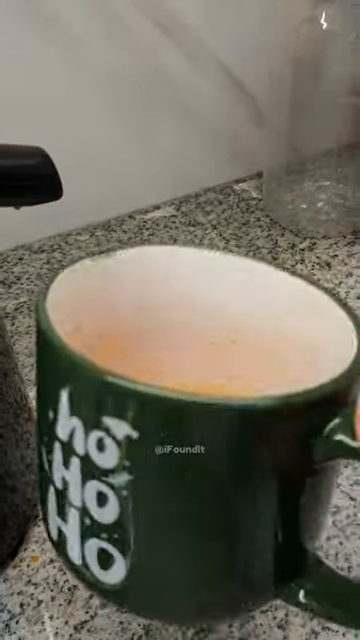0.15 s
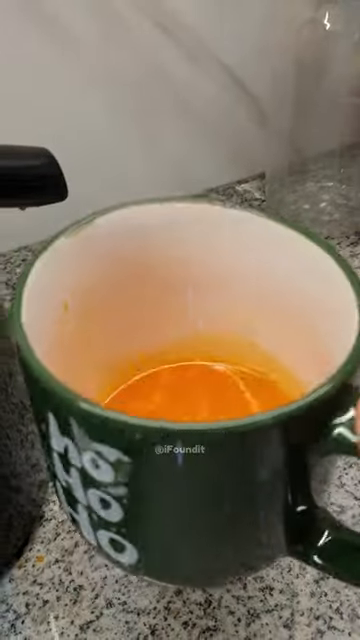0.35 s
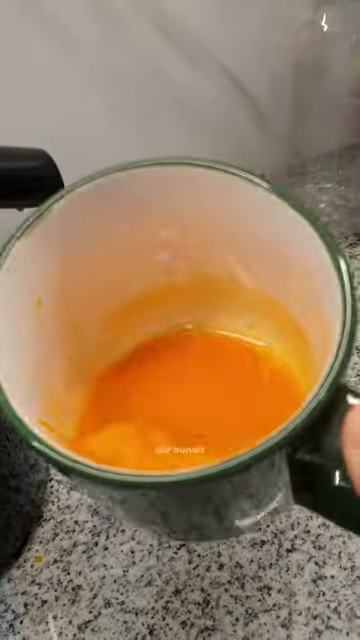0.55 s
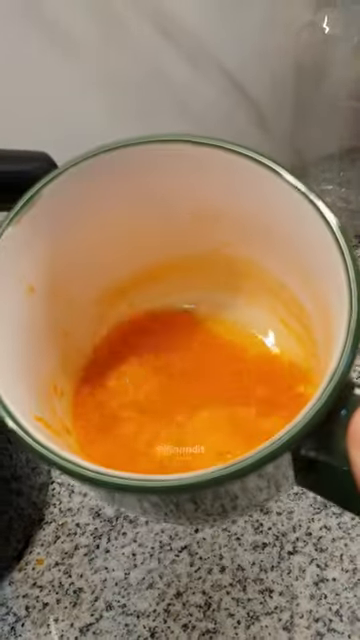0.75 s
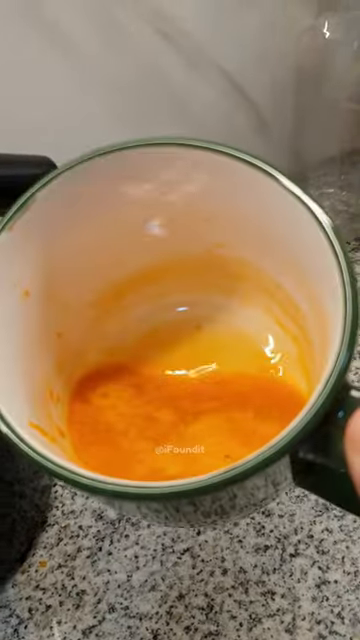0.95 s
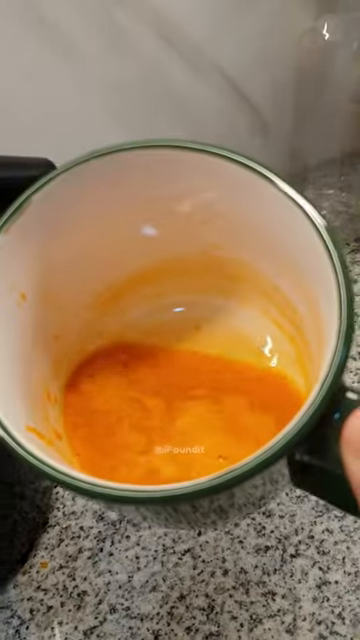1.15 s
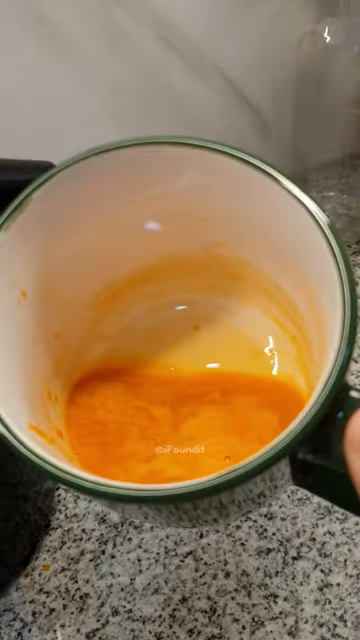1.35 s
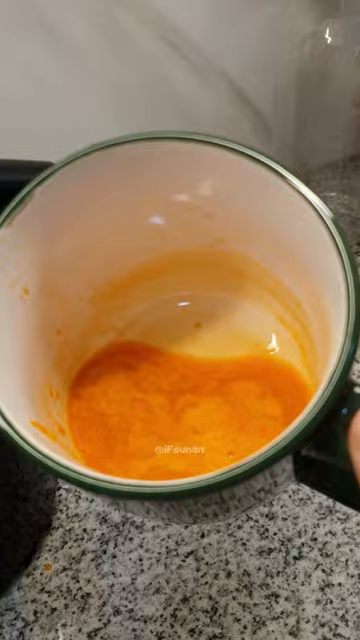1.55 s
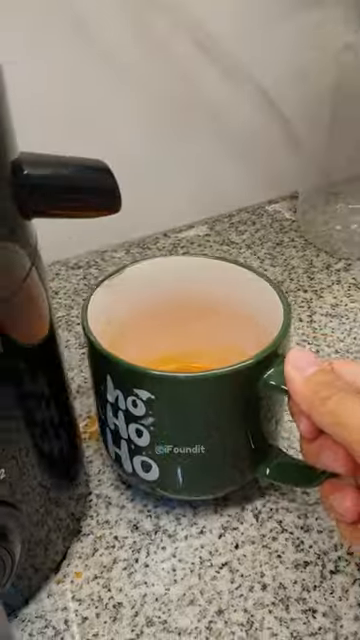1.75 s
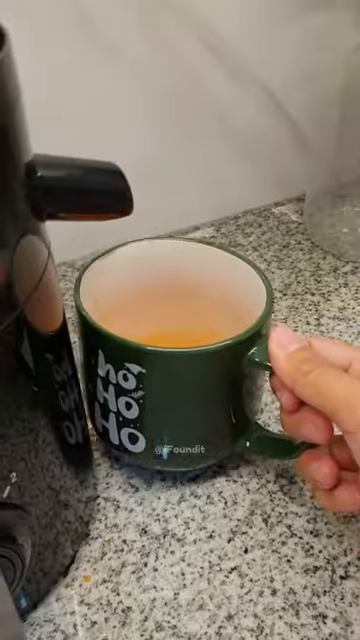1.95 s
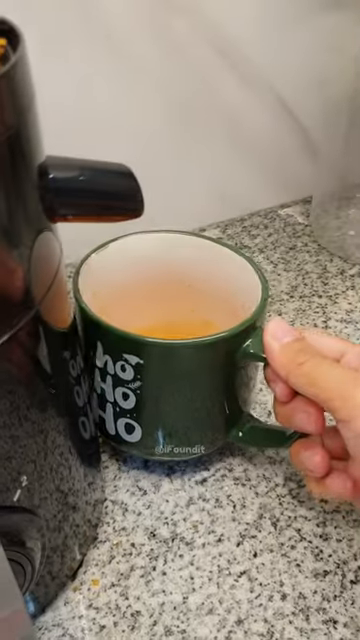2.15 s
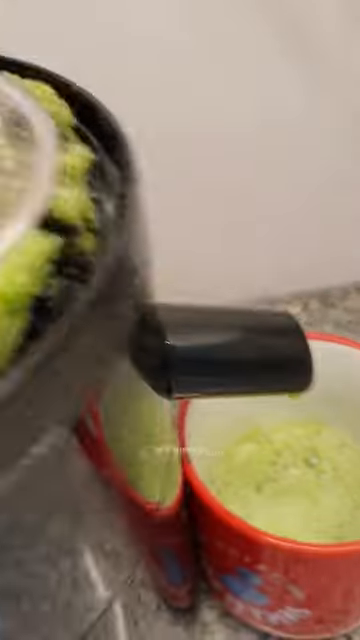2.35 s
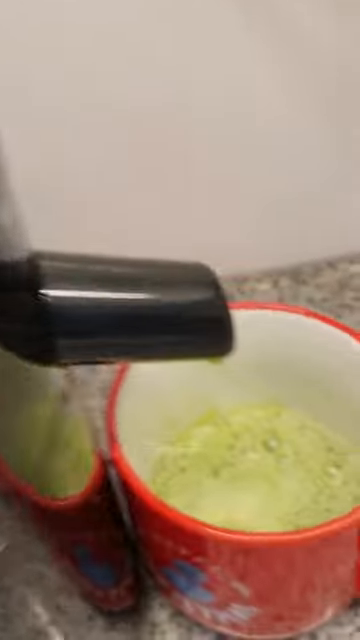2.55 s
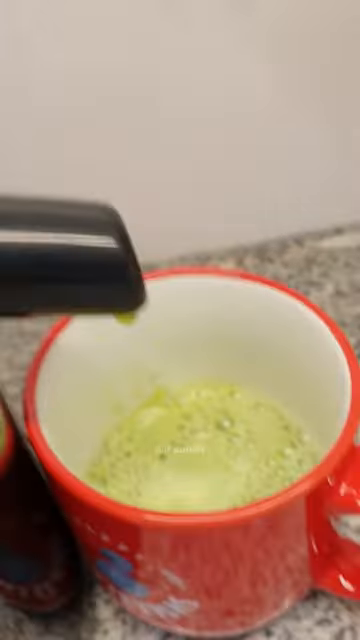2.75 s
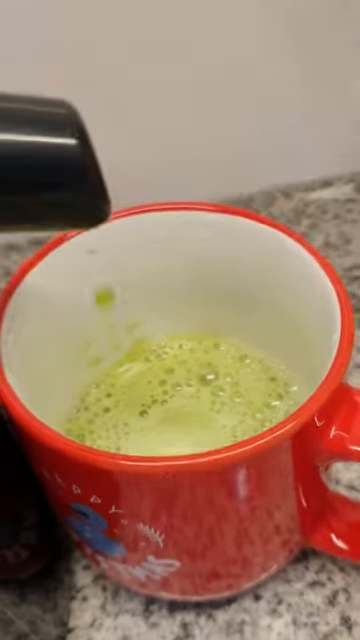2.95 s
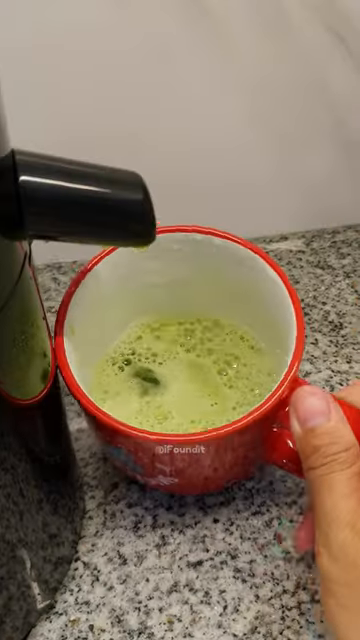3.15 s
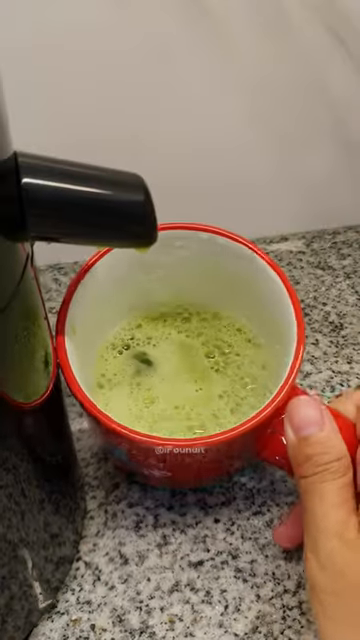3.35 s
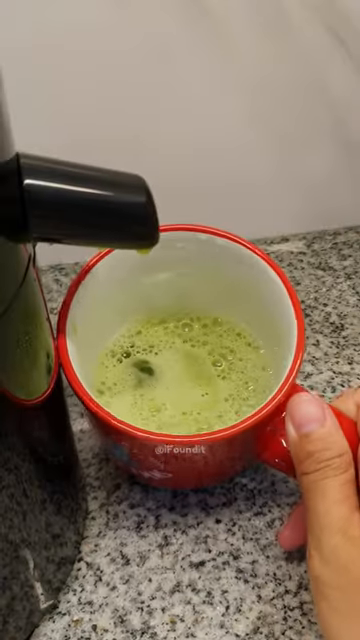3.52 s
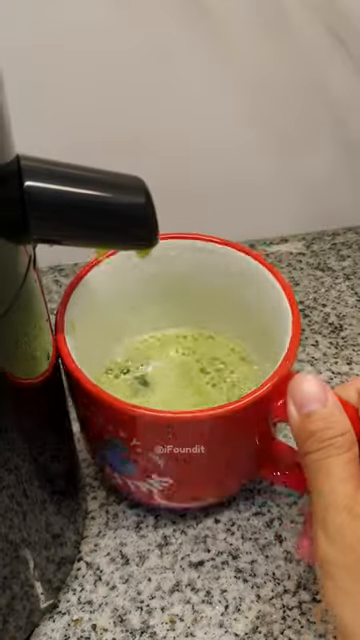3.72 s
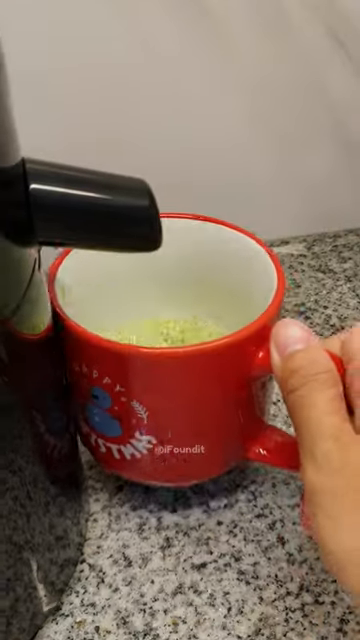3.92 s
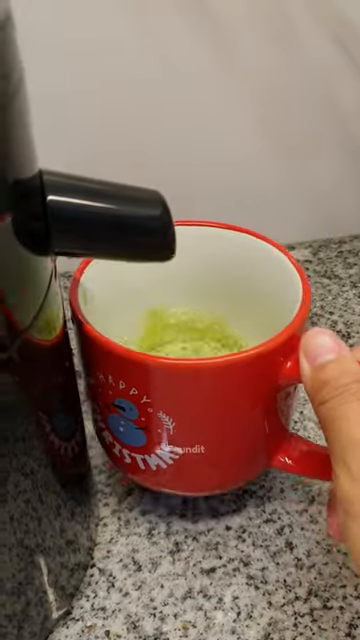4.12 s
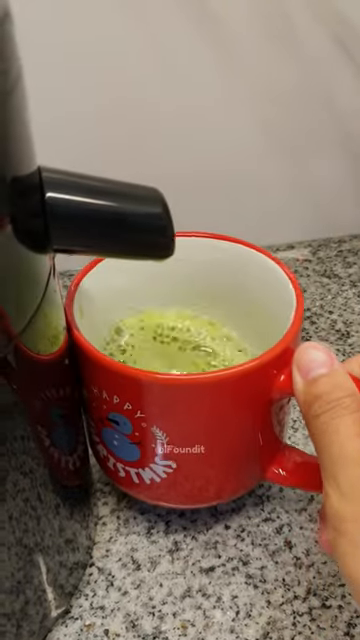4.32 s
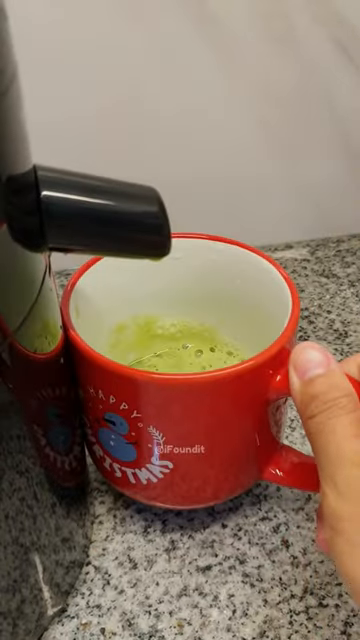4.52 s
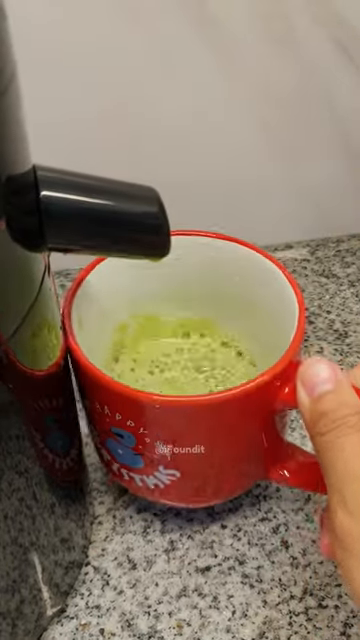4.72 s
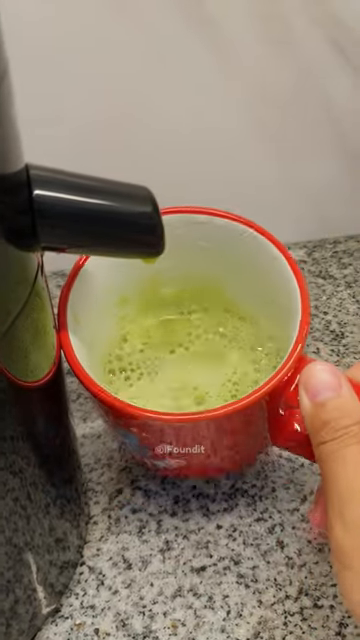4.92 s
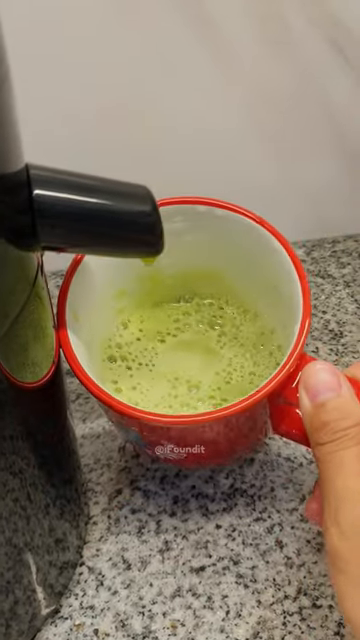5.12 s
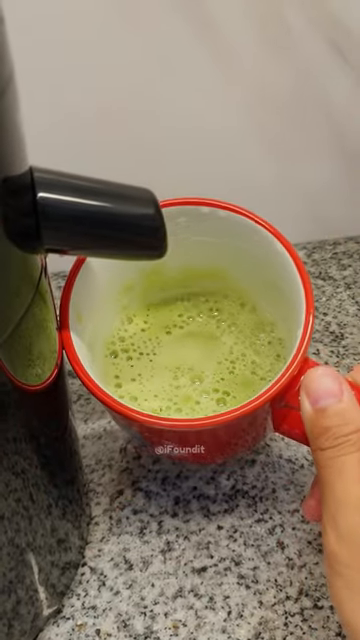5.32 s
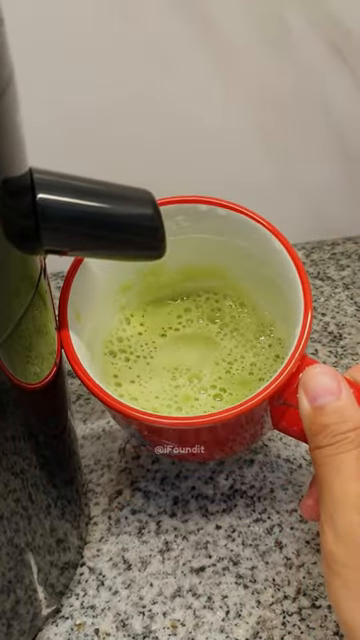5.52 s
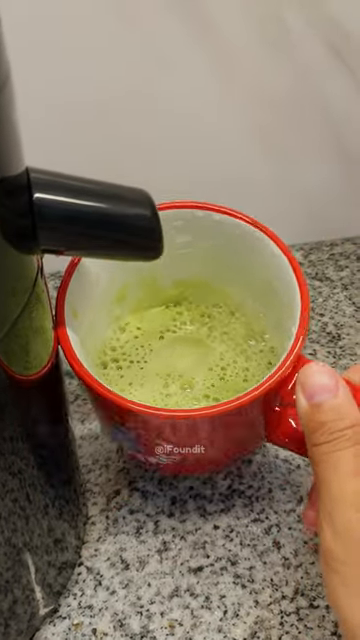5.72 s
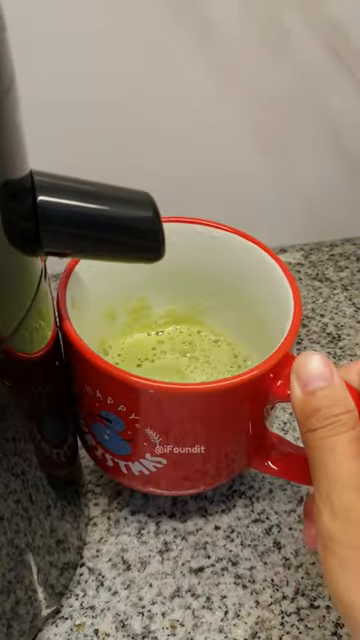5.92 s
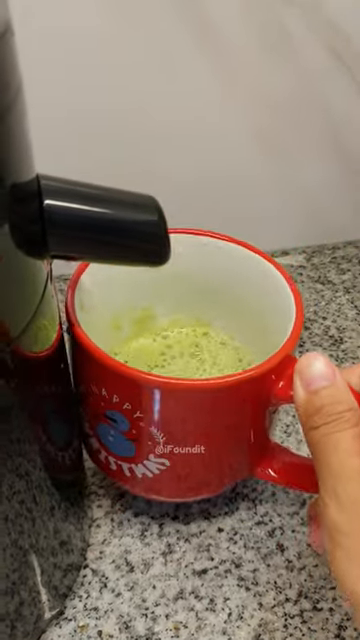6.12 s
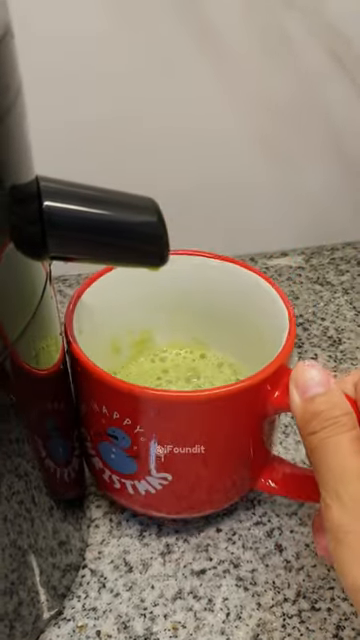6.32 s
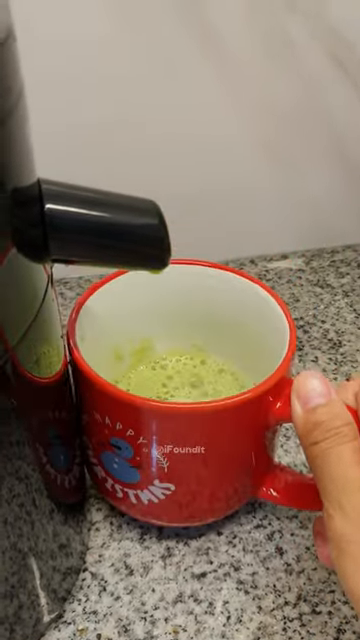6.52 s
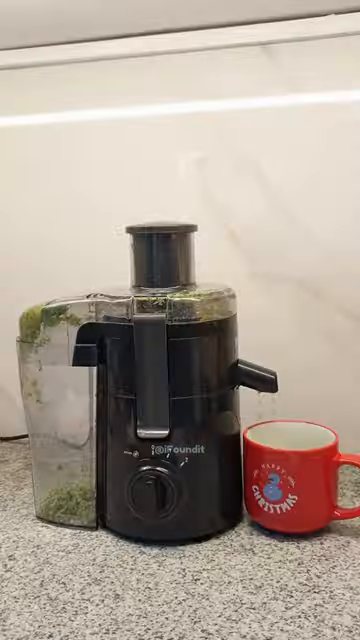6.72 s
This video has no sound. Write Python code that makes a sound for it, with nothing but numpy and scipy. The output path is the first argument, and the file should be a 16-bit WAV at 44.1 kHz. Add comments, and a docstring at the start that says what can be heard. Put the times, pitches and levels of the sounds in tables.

```python
"""Two ceramic mugs on a stone counter beside a switched-off juicer, in a small hard kitchen.
Faint appliance hum and hand-held microphone rumble run throughout. At 1.8 s a mug lands, rocks on
its gritty foot and settles, then bumps the juicer's hollow plastic housing. Fingers brush a handle
(3.1 s), a base knocks and scrapes on the stone, and dull bumps on the housing follow (4.0-4.8 s).
At 6.0 s a soft thump and a rub; at 6.4 s the second mug lands hard and rocks, its ring cut short."""
import sys
import numpy as np
from scipy import signal
from scipy.fft import rfft, irfft, next_fast_len
from scipy.io import wavfile
from scipy.ndimage import uniform_filter1d

SR = 44100
rng = np.random.default_rng(int(sys.argv[2]) if len(sys.argv) > 2 else 0)


def output_pcm(signal):
    """Save a mono or channel-first signal as 16-bit PCM at the path in sys.argv[1].

    Samples are clipped to [-1, 1] before scaling.
    """
    pcm = np.clip(np.atleast_2d(signal).T, -1, 1) * 32767
    wavfile.write(sys.argv[1], SR, np.round(pcm).astype(np.int16))


N = 298551


def amp(db):
    """dB to gain."""
    return 10 ** (np.asarray(db) / 20)


def unit_rms(x):
    """Scale to rms 1."""
    return x / np.sqrt(np.mean(x ** 2) + 1e-20)


def at_hz(points, hz):
    """Interpolate a table over log frequency."""
    f, value = np.transpose(points)
    return np.interp(np.log(hz + 1), np.log(f + 1), value)


def gain_curve(rows):
    """(t/s, level/dB) points to gain per sample."""
    return amp(np.interp(np.arange(N) / SR, *np.transpose(rows)))


def add(mix, start_s, sound):
    """Mix a sound in at start_s."""
    part = mix[..., round(start_s * SR):][..., :sound.shape[-1]]
    part += sound[..., :part.shape[-1]]


def pan(db):
    """Stereo gains; db is left minus right."""
    return amp(np.array([[db], [-db]]) / 2)


def noise(spectrum, size, shared, tilt_db_oct=0):
    """Coloured stereo noise, rms 1, tilted above 1 kHz; shared is the power common to both sides."""
    hz = np.fft.rfftfreq(size, 1 / SR)
    white = rng.standard_normal((3, size))
    pair = np.sqrt(shared) * white[0] + np.sqrt(1 - shared) * white[1:]
    colour = amp(at_hz(spectrum, hz) + tilt_db_oct * np.log2(np.maximum(hz / 1000, 1)))
    return unit_rms(irfft(rfft(pair) * colour, size))


def ring(modes, t, pitch=1, tilt_db_oct=0, pivot_hz=1000):
    """Damped sines; pitch scales their frequencies, tilt weights them about pivot_hz."""
    out = 0
    for hz, db, t60_s in modes:
        gain = amp(db + tilt_db_oct * np.log2(hz / pivot_hz))
        out += gain * np.exp(-np.log(1000) * t / t60_s) * np.sin(2 * np.pi * hz * pitch * t)
    return out


def pulse(spectrum, size):
    """Minimum-phase pulse, peak 1."""
    hz = abs(np.fft.fftfreq(size, 1 / SR))
    log_gain = np.log(amp(at_hz(spectrum, hz)))
    x = np.fft.ifft(np.exp(np.conj(signal.hilbert(log_gain)))).real
    return x / abs(x).max()


def friction(strokes, spectrum, grain_db, attack_s=0.004, release_s=0.0094):
    """Stick-slip: short noise strokes whose level jitters by grain_db rms."""
    out = np.zeros((2, N))
    for start_s, length_s, db, tilt_db_oct in strokes:
        t = np.arange(int(length_s * SR)) / SR
        jitter = unit_rms(uniform_filter1d(rng.standard_normal(len(t)), size=90))
        hiss = noise(spectrum, len(t), shared=0.45, tilt_db_oct=tilt_db_oct)
        fade = np.minimum(t / attack_s, 1) * np.minimum((length_s - t) / release_s, 1)
        add(out, start_s, amp(db) * unit_rms(hiss * amp(grain_db * jitter)) * fade)
    return out


# Hum before panning: t/s, level/dB
HUM_LEVELS = [(0, -77), (2, -76.5), (2.7, -70.5), (6.77, -72)]


def appliance_hum(hum_hz=358, waver=0.26):
    """One wavering tone on the right, growing as the microphone nears it."""
    drift = waver * noise([(1, 0), (4, -6), (15, -60), (100, -140)], N, shared=0.8)
    tone = np.sqrt(2) * np.sin(2 * np.pi * hum_hz * np.arange(N) / SR + drift)
    return gain_curve(HUM_LEVELS) * (1 + drift) * tone * pan(db=-18)


# Air noise density: f/Hz, level/dB
AIR_SPECTRUM = [(25, -9.5), (55, -0.5), (200, -19.5), (400, -14.5), (480, -19.5), (600, -27.5), (2300, -32),
                (4500, -37.5), (7000, -47.5), (10000, -42.5), (12000, -33.5), (15500, -39)]


def room_air(level_db=-68.5):
    """Still air: a steady noise floor."""
    return amp(level_db) * noise(AIR_SPECTRUM, N, shared=0.25) * pan(db=1.5)


# Rumble density: f/Hz, level/dB
RUMBLE_SPECTRUM = [(25, -15), (58, 8), (90, 7), (105, -6), (120, 9.5), (142, -5.5), (166, 2.5), (200, -10),
                   (235, -8), (300, -16), (440, -11), (600, -24.5), (1500, -47)]
# Rumble level and balance, dropping away at the end: t/s, level/dB before trim, left minus right/dB
RUMBLE_LEVELS = [(0.0, -71.5, -12), (1.15, -75.5, -17), (2.55, -61.5, -2), (2.85, -58, -1.5),
                 (3.86, -63, -3), (4.54, -56.5, 0.5), (4.94, -62, -3), (6.35, -57.5, -2), (6.62, -66, -1),
                 (6.77, -71, 8)]


def handling_rumble(trim_db=1):
    """Low rumble of a hand-held microphone, booming in the room modes."""
    left = gain_curve([(s, db + pan_db / 2) for s, db, pan_db in RUMBLE_LEVELS])
    right = gain_curve([(s, db - pan_db / 2) for s, db, pan_db in RUMBLE_LEVELS])
    return amp(trim_db) * np.array([left, right]) * noise(RUMBLE_SPECTRUM, N, shared=1)


# Modes of the held mug and of the knocked slab: f/Hz before pitch factor, level/dB, t60/s
MUG_MODES = [(846, -2.5, 0.3), (962, -11.5, 0.047), (1249, -19.5, 0.05), (1385, -22, 0.027),
             (1822, -21, 0.06), (2200, -26, .03), (2530, -19, 0.012)]
THUD_MODES = [(168, -7.5, 0.045), (302.3, -4, 0.036), (492, -6.5, 0.028)]
# Densities of the first touch and of the foot's crack and grit: f/Hz, level/dB
CLICK_SPECTRUM = [(150, -20), (600, -15), (880, 1), (1400, -8), (2500, -9), (3600, -24), (15000, -47)]
CRACK_SPECTRUM = [(100, -30), (600, -22.5), (850, -4.5), (1100, -6), (1450, -1.5), (1700, -9), (2100, -4),
                  (2750, -2), (3500, -22.5), (4200, -21.5), (5200, -9), (6300, -20.5), (11000, -25.5),
                  (15000, -48.5)]
GRIT_SPECTRUM = [(2000, -17.5), (5500, -7), (8000, -23), (9300, -3), (10200, 2.5), (11500, -8),
                 (14000, -23)]
# Mug knocks, and the quick echoes just after each of the two landings:
# t/s, level/dB, pitch factor, hardness/Hz, ring/s, click/dB, grit/dB
KNOCKS_AND_ECHOES = [(1.7562, -24.5, 0.86, 2000, 0.0038, -4, -29), (1.7665, -28, 1.0, 2500, .008, -22, -36),
                     (1.7761, -31, 1.04, 1500, .0065, -30, -37),
                     (1.8593, -16, 1.04, 1230, 0.007, -35, -38.5),
                     (1.9163, -19.5, 1.03, 1000, .0069, -36, -42.5),
                     (1.9831, -28.5, 1.045, 840, 0.0081, -40, -43), (2.003, -32, 1.02, 784, .009, -38, -40),
                     (2.1917, -30, 1.016, 1060, 0.0079, -24, -37),
                     (3.3577, -31.5, 1.08, 2100, .011, -9, -46),
                     (6.447, -4.5, 1.105, 4370, 0.0052, -4, -34.5),
                     (6.465, -18, 1.15, 2790, 0.0056, -16.5, -33),
                     (6.4998, -10.5, 1.126, 2460, 0.0061, -13, -43),
                     (6.5371, -17, 1.134, 2010, 0.0063, -19, -46),
                     (6.5522, -21, 1.07, 1700, 0.0063, -22, -56),
                     (6.559, -22, 1.09, 1500, 0.0058, -25, -58)]


def mug_knocks(lag_s=0.00013, contact_s=0.00035, crack_s=0.0045, grit_s=0.003, thud_db=-16.5,
               tail_db=-30, tail_s=0.041, choke_hz=5500, crack_full_hz=3040, crack_db_oct=14.5):
    """A mug clicks on stone and rings until its base chokes it; the unglazed foot cracks and grits."""
    out, t = np.zeros((2, N)), np.arange(SR // 6) / SR
    heard_s = np.maximum([t - lag_s, t], 0)  # right side leads
    contact = 1 - np.exp(-(heard_s / contact_s) ** 2)
    radiation = signal.butter(4, 780, "high", fs=SR, output="sos")  # small body, little bass
    thud = amp(thud_db) * ring(THUD_MODES, heard_s, pitch=0.9) * contact / 2
    click = np.interp(heard_s, t, pulse(CLICK_SPECTRUM, len(t))) * (heard_s > 0)
    for start_s, db, pitch, hard_hz, ring_s, click_db, grit_db in KNOCKS_AND_ECHOES:
        detune = 1 + 0.015 * rng.uniform(-1.2, 1)
        choke = np.exp(-(t / ring_s) ** (choke_hz / hard_hz))  # soft blows stay in contact: steeper
        decay = choke + amp(tail_db) * np.exp(-t / tail_s)
        body = pan(db=1) * ring(MUG_MODES, heard_s, pitch * detune) * decay
        crack_db = crack_db_oct * min(np.log2(hard_hz / crack_full_hz), 0)
        crack = amp(crack_db) * noise(CRACK_SPECTRUM, len(t), shared=0.74) * np.exp(-t / crack_s) / 2
        grit = amp(grit_db) * noise(GRIT_SPECTRUM, len(t), shared=0.3) * np.exp(-t / grit_s)
        radiated = signal.sosfilt(radiation, (body + crack) * contact)
        softness = signal.butter(3, hard_hz, fs=SR, output="sos")  # soft blows miss the upper modes
        blow = signal.sosfilt(softness, radiated - thud)
        add(out, start_s, amp(db) * (blow + amp(click_db) * click + grit * contact))
    return out


# Foot on stone: t/s, length/s, level/dB, tilt/(dB/oct)
GRIND_STROKES = [(1.757, 0.035, -74, -2), (1.975, 0.09, -74.5, 6)]


def foot_grinds():
    """The rocking foot grinds on the stone."""
    return friction(GRIND_STROKES, GRIT_SPECTRUM, grain_db=3)


# Low worktop modes: f/Hz before pitch factor, level/dB, t60/s
SLAB_MODES = [(117.3, -13, 0.26), (167, 0, 0.27), (232, -14, 0.18), (293, -15, 0.21)]
# Weight on the counter: t/s, level/dB, rise/s
SETTLE_PUSHES = [(2.017, -46, 0.003), (3.36, -44, 0.0031), (5.983, -23.5, 0.038), (6.561, -33.5, 0.0013)]


def mug_settles():
    """The mug's weight softly pushes the worktop, moving only its low modes."""
    out, t = np.zeros((2, N)), np.arange(SR // 2) / SR
    thump = pan(db=1) * ring(SLAB_MODES, t, pitch=0.98)
    for start_s, db, rise_s in SETTLE_PUSHES:
        add(out, start_s, amp(db) * thump * (1 - np.exp(-(t / rise_s) ** 2)))
    return out


# Thin plastic wall with the mug against it: f/Hz, level/dB, t60/s
WALL_MODES = [(800, -17, .1), (942, -16, 0.13), (1075, -13, 0.11), (1900, -20, 0.05), (2270, -19, 0.05),
              (2510, -9, .05), (2790, -6, 0.05), (3300, -11, 0.05), (4320, -17, .06), (5700, -20, .06)]
# Hollow housing: f/Hz before pitch factor, level/dB, t60/s
HOUSING_MODES = [(121, -5, .34), (167, -2.5, .16), (236, -9, .22), (286, -3, .23), (350, -15, .12)]
# Rattle density: f/Hz, level/dB
RATTLE_SPECTRUM = [(150, 13.5), (480, 0), (680, -7), (950, 8), (1400, -5.5), (2000, -3), (2800, -4),
                   (4100, -7), (5500, -14), (8000, -19), (11500, -14.5), (15500, -29)]
# Mug on housing: t/s, slap/dB, slap tilt/(dB/oct), wall re slap/dB,
# thump/dB, thump tilt/(dB/oct), rise/s, mug cavity/dB
HOUSING_HITS = [(2.1397, -39.5, 0, -11.5, -38.5, -3, 0.0037, -39.5),
                (4.0105, -29, 1, -2, -25, 4, 0.0071, -55), (4.3238, -30.5, 0, 1, -30, 9.5, 0.0069, -50.5),
                (4.35, -37, -0.5, -2, -29, -7, 0.018, -49),
                (4.5254, -41, -2.5, -2.5, -33.5, -4, 0.0053, -54),
                (4.541, -45, -2.5, -5, -45, 6, 0.0053, -63),
                (4.7388, -45.5, -4, 2.5, -33.5, -3, 0.0032, -63)]


def housing_bumps(lag_s=0.000083, attack_s=0.00078, rattle_s=0.015, cavity_hz=478, cavity_t60_s=0.15):
    """A rattling slap on the plastic wall; housing modes and the mug's cavity then swell and die."""
    out, t = np.zeros((2, N)), np.arange(SR // 2) / SR
    heard_s = np.maximum([t - lag_s, t], 0)
    cavity = pan(db=-11.5) * ring([(cavity_hz, 0, cavity_t60_s)], t)
    radiation = signal.butter(3, 90, "high", fs=SR, output="sos")  # wall radiates no deep bass
    for start_s, slap_db, slap_db_oct, wall_db, thump_db, thump_db_oct, rise_s, boom_db in HOUSING_HITS:
        # each spot favours other modes
        modes = [(hz, db + 4 * rng.uniform(-0.92, 1), t60_s) for hz, db, t60_s in WALL_MODES]
        wall = amp(wall_db) * ring(modes, heard_s, tilt_db_oct=slap_db_oct, pivot_hz=1026)
        rattle = noise(RATTLE_SPECTRUM, len(t), shared=0.35, tilt_db_oct=slap_db_oct)
        rattle *= np.exp(-t / rattle_s)
        slap = signal.sosfilt(radiation, (rattle + wall) * (1 - np.exp(-t / attack_s)))
        thump = pan(db=1) * ring(HOUSING_MODES, t, pitch=0.99, tilt_db_oct=thump_db_oct, pivot_hz=173)
        hollow = amp(thump_db) * thump + amp(boom_db) * cavity
        swell = 1 - np.exp(-(t / rise_s) ** 2)
        add(out, start_s, amp(slap_db) * slap + hollow * swell)
    return out


# Brush density: f/Hz, level/dB
BRUSH_SPECTRUM = [(1000, -1), (3200, -4), (4200, 11), (6000, -4), (7400, 3), (8500, -17)]
# Fingers on handle: t/s, length/s, level/dB, tilt/(dB/oct)
BRUSH_STROKES = [(3.14, 0.098, -74, 11), (3.19, .04, -68.5, -2.5)]


def finger_brushes():
    """Fingers brush the handle."""
    return friction(BRUSH_STROKES, BRUSH_SPECTRUM, grain_db=-3.5)


# Scrape density: f/Hz, level/dB
SCRAPE_SPECTRUM = [(500, -38), (800, -5.5), (1000, 10.5), (1400, -24), (2500, -10.5), (3600, -39),
                   (5200, -10.5), (7500, -25.5), (9500, -13.5), (12500, -17), (14000, -54)]
# Base on stone: t/s, length/s, level/dB, tilt/(dB/oct)
SCRAPE_STROKES = [(3.604, 0.07, -59, 0.5), (3.675, 0.1, -63, -0.5)]


def base_scrapes():
    """The base drags on the stone, each stroke tapering off."""
    return friction(SCRAPE_STROKES, SCRAPE_SPECTRUM, grain_db=2, release_s=0.073)


# Rub density: f/Hz, level/dB
RUB_SPECTRUM = [(500, -18), (1000, 8), (1500, -8.5), (2900, -1.5), (3900, -14.5), (9000, -38)]
# Mug along housing: t/s, length/s, level/dB, tilt/(dB/oct)
RUB_STROKES = [(5.98, 0.09, -68, -1.5)]


def side_rubs():
    """The mug's side rubs along the plastic."""
    return friction(RUB_STROKES, RUB_SPECTRUM, grain_db=1.5)


# Port imbalance: f/Hz, left minus right/dB
PORT_BALANCE = [(100, 1), (700, -2.5), (1290, -4.5), (2380, -4), (4400, 0), (8120, 1), (15000, 2)]


def microphone_ports(x):
    """The right port favours the upper middle, the left one the treble."""
    size = next_fast_len(N + SR // 10)
    half_db = at_hz(PORT_BALANCE, np.fft.rfftfreq(size, 1 / SR)) / 2
    return irfft(rfft(x, size) * amp([half_db, -half_db]), size)[:, :N]


# Near surfaces: left delay/s, right delay/s, level/dB
EARLY_ECHOES = [(0.0126, 0.0093, -23), (0.0183, 0.027, -30.5), (.0285, .028, -25.5)]
# Tail decay: f/Hz, t60/s
TAIL_DECAY = [(120, 0.2), (400, 0.47), (1000, 0.25), (2500, 0.43), (5000, 0.36), (12000, 0.21)]
# Tail colour: f/Hz, level/dB
TAIL_COLOUR = [(100, -7), (500, 3.5), (900, 1), (1400, 4.5), (2700, -5.5), (3800, -7), (7500, 2),
               (12000, 0)]


def kitchen(x, wet_db=-11, build_s=0.01):
    """Direct sound, single echoes from wall and appliance, and a short diffuse tail."""
    hz, t, bands = signal.stft(rng.standard_normal((2, SR // 2)), SR, nperseg=256)
    colour = amp(at_hz(TAIL_COLOUR, hz))[:, None]
    decay = np.exp(-np.log(1000) * t / at_hz(TAIL_DECAY, hz)[:, None])
    build = 1 - np.exp(-t / build_s)
    tail = signal.istft(bands * colour * decay * build, SR, nperseg=256)[1]
    response = amp(wet_db) * tail / np.linalg.norm(tail[0])
    for left_s, right_s, db in EARLY_ECHOES:
        response[0, int(left_s * SR)] += amp(db)
        response[1, int(right_s * SR)] += amp(db)
    return x + signal.fftconvolve(x, response, axes=1)[:, :N]


def scene(hush_s=6.658, hush_db=-18.5):
    """Mugs in the kitchen over hum, air and rumble; the ringing drops abruptly at hush_s."""
    strokes = base_scrapes() + side_rubs() + finger_brushes() + foot_grinds()
    impacts = mug_knocks() + housing_bumps() + mug_settles()
    mugs = kitchen(microphone_ports(impacts + strokes))
    hushed = uniform_filter1d((np.arange(N) / SR > hush_s).astype(float), size=128)
    return mugs * amp(hush_db * hushed) + appliance_hum() + room_air() + handling_rumble()


def record(dry, ceiling=0.95, edge_hz=15850):
    """Soft peak limit, then low-pass."""
    rounded = dry / (1 + (dry / ceiling) ** 4) ** 0.25
    lowpass = signal.firwin(511, edge_hz, window=("kaiser", 9), fs=SR)
    return signal.oaconvolve(rounded, lowpass[None], "same")


dry = scene()
out = record(dry)
output_pcm(out)
```